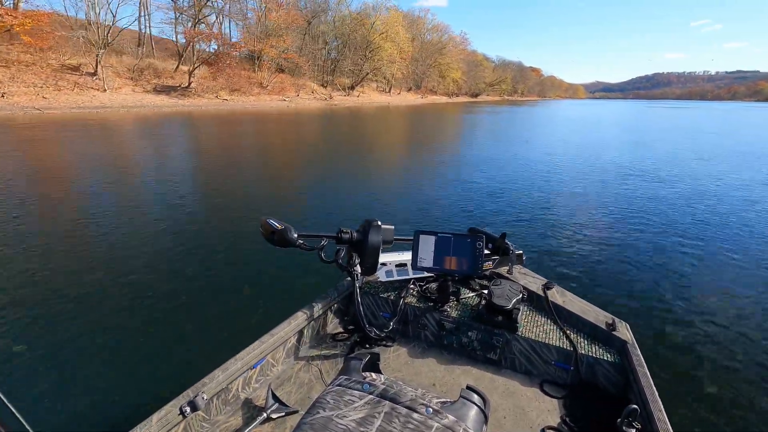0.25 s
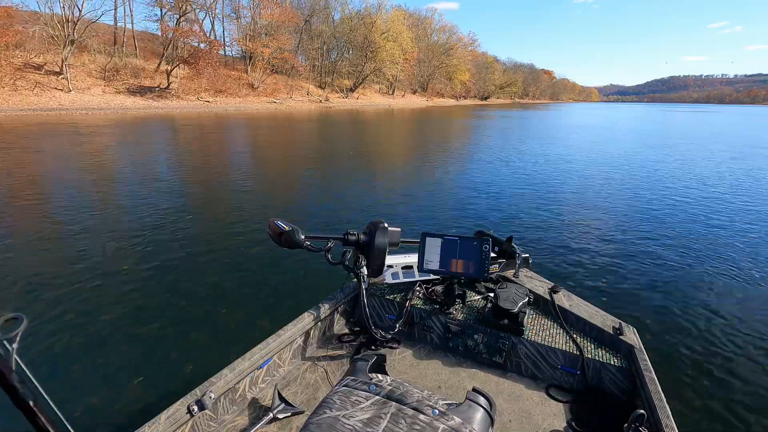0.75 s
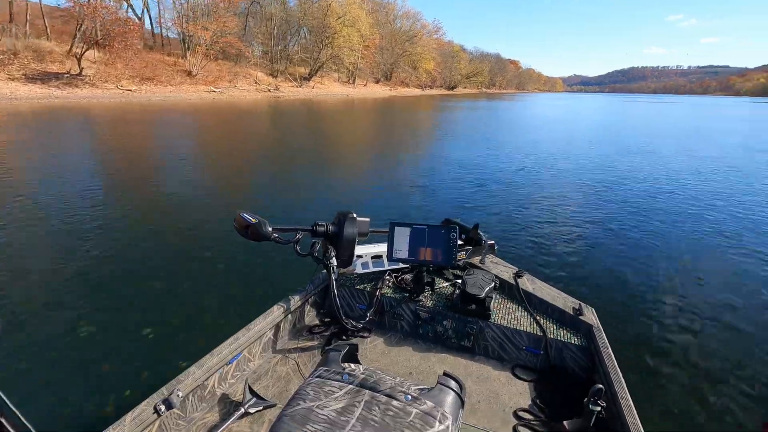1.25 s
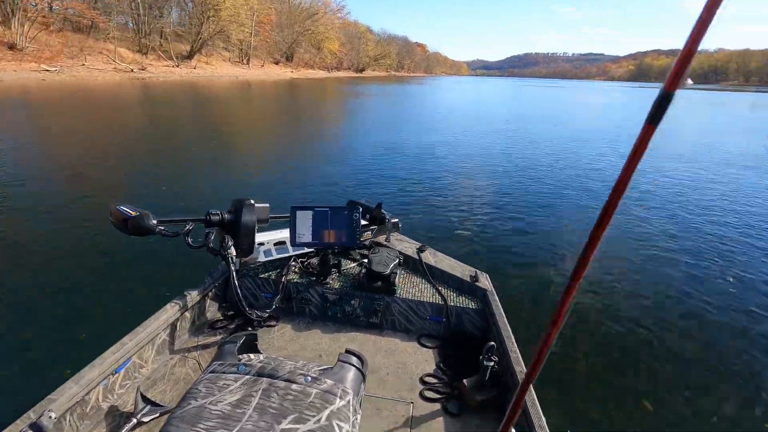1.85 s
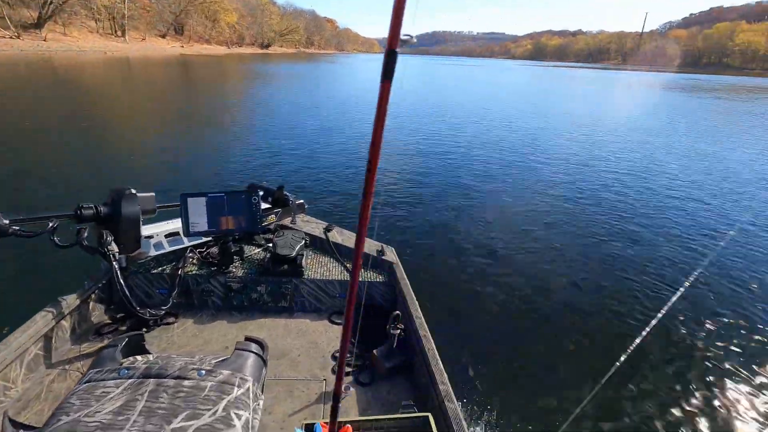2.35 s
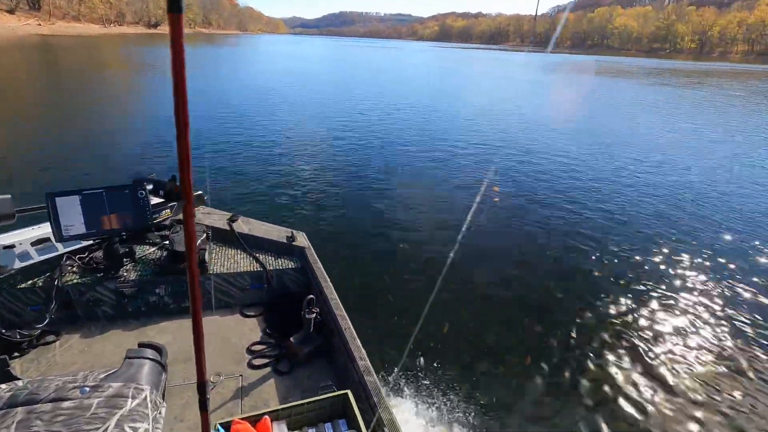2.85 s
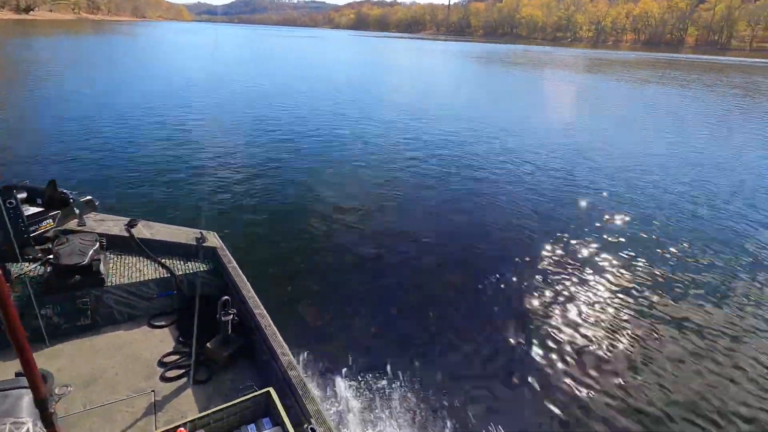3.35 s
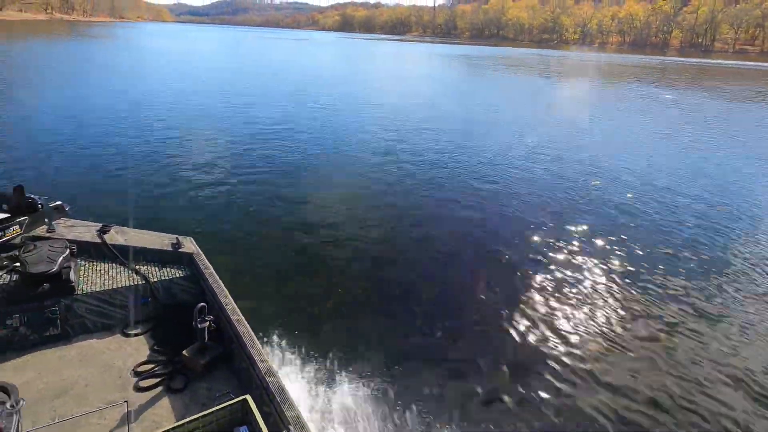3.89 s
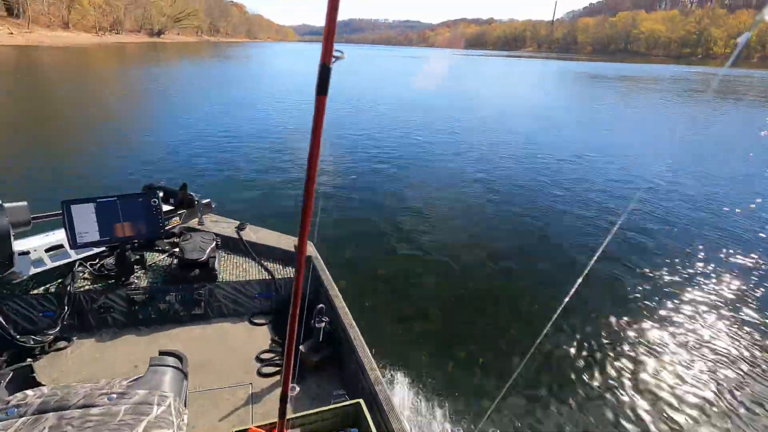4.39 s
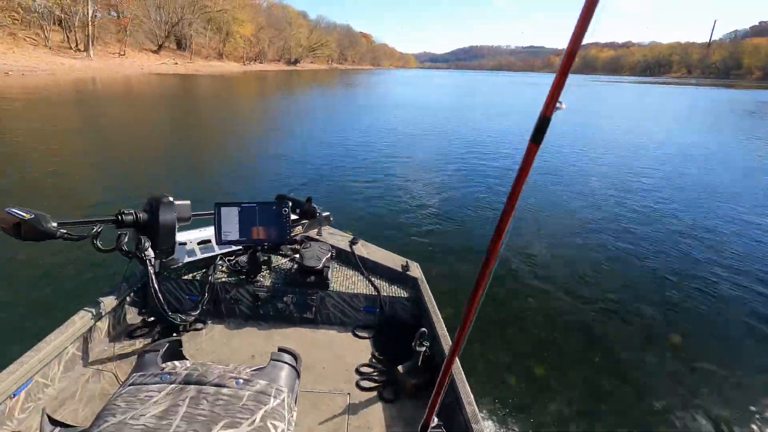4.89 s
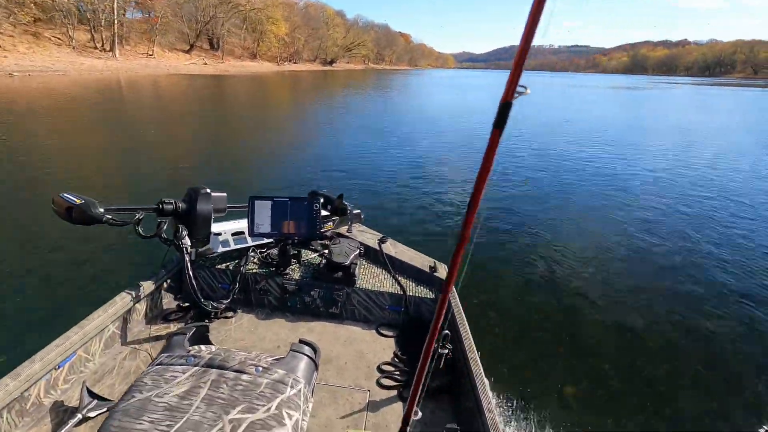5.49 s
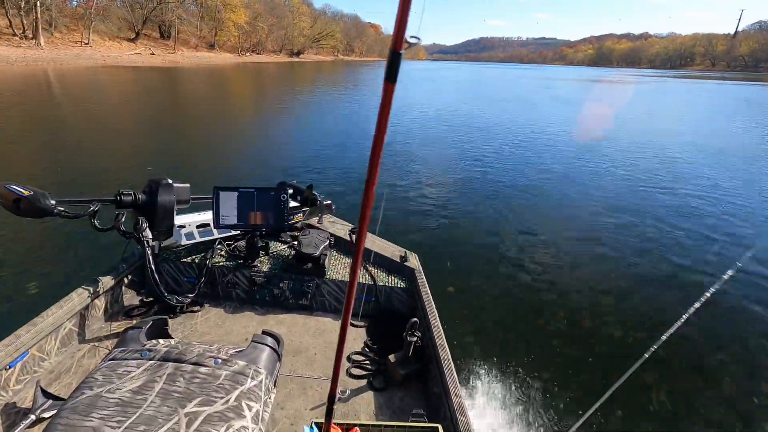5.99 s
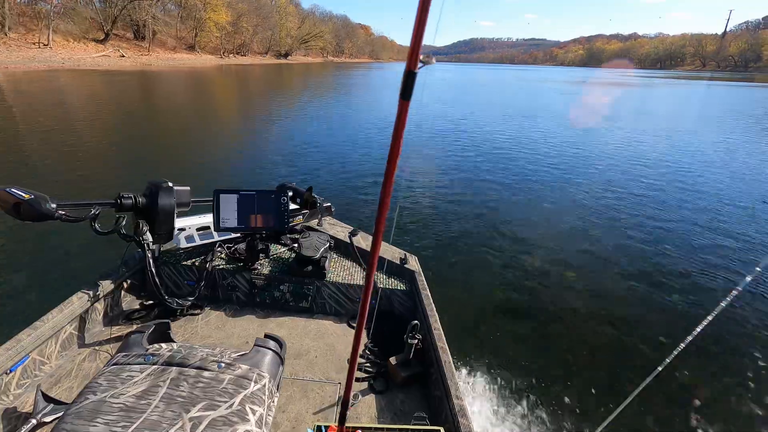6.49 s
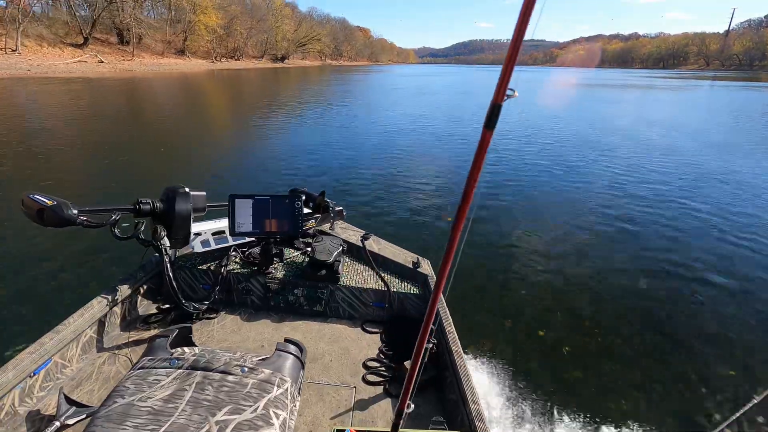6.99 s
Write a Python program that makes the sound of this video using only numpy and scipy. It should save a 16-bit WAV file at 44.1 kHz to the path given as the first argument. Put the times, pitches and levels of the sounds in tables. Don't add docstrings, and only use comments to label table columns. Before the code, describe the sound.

A boat engine holds one low, buzzing note around 160 hertz without changing speed. Wind hits the exposed onboard microphone in soft round thumps, low rumble and crackling gusts, moderate at first, then choppier from about two seconds and strongest and longest near five. Behind it lie a thin water hiss, a faint pump whine and an airy high whistle. Outdoors, dry and close.

```python
import sys
import numpy as np
from scipy import signal
from scipy.fft import rfft, irfft
from scipy.io import wavfile
from scipy.ndimage import uniform_filter1d, minimum_filter1d

SR = 44100
rng = np.random.default_rng(int(sys.argv[2]) if len(sys.argv) > 2 else 0)


def int16_out(signal):
    q = np.round(np.clip(np.atleast_2d(signal).T, -1, 1) * 32767)
    wavfile.write(sys.argv[1], SR, q.astype(np.int16))


def level_to_linear(level):
    exponent = np.asarray(level, float) / 20
    return 10 ** exponent


N = 319284
T = np.arange(N) / SR

# time in seconds, shaft turns in Hz.
SHAFT_SPEED = [(0.25, 39.9), (0.65, 40.22), (1.05, 40.28), (1.45, 40.11), (1.85, 39.98), (2.25, 40.05),
               (2.65, 40.06), (3.05, 40.02), (3.45, 40.05), (3.85, 39.98), (4.25, 40.01), (4.65, 40.05),
               (5.05, 40.11), (5.45, 40.05), (5.85, 40.23), (6.25, 40.19), (6.65, 40.05)]
# level in dB, waver in dB.
SHAFT_ORDERS = [(-38, 0.5), (-31, 0.5), (-35.5, -0.5), (3, -0.5), (-24, 6), (-23, 2.5), (-32.5, 2.5),
                (-22.5, 2), (-38, 3.5), (-25.5, 2.9), (-43.5, 1.5), (-38, 5), (-36, 2.5), (-27, 0),
                (-42, -1), (-35, 2), (-36, 4.5), (-47.5, 1.5), (-38.5, 5), (-47.5, 0.5), (-50, 1.5),
                (-50.5, 4), (-38.5, 1.5), (-47.5, 1), (-42.5, 4)]
# time in seconds, casing in dB, pump whine in dB.
FACING = [(0, 2, -54), (.7, 3.5, -49.5), (1.72, 2.5, -50.5), (1.9, 2.5, -65), (2.4, -4.5, -63),
          (3.25, -2, -60), (3.6, -2, -54), (4.1, 3.5, -48), (4.3, 2.5, -62), (5.6, -2, -63.5),
          (6.5, -4.5, -65), (7.24, 0, -62)]
# frequency in Hz, density in dB per Hz.
CLATTER_COLOUR = [(150, -29), (250, 2.5), (448, -19), (557, -19.5), (844, -19), (1710, -26), (2020, -29),
                  (3000, -38), (3900, -64), (6600, -120)]
# frequency in Hz, level in dB.
INTAKE_TONES = [(132.5, -37), (265, -36.5)]
# time in seconds, spray in dB, brightness at the top in dB.
SPRAY_VIEW = [(0, -57, -6.5), (.8, -56, -9.5), (1.65, -56, -8.5), (1.98, -58, -15.5), (2.14, -57.5, -9.5),
              (2.96, -57, -9), (3.39, -52, -8.5), (4.17, -49.5, -8), (4.38, -57.5, -10.5),
              (4.49, -53.5, -13), (4.94, -57, -13.5), (5.4, -55.5, -8.5), (5.85, -54, -11.5),
              (6.09, -51, -10.5), (6.25, -53, -11), (6.35, -52, -7.5), (6.69, -56.5, -8.5),
              (7.24, -52, -10)]
# frequency in Hz, density in dB per Hz.
SPRAY_COLOUR = [(880, -36), (1500, -7.5), (1630, -2.5), (1710, -6.5), (1770, -7.5), (2090, -10), (2550, -3),
                (3170, -3.5), (4140, -4), (5630, -9.5), (6930, -10), (9190, -16.5), (10900, -26.5),
                (14200, -53), (22000, -120)]
# frequency in Hz, density in dB per Hz.
HIGH_HISS_COLOUR = [(9000, -30), (11000, 0), (12500, -4), (14000, -8), (15800, -13), (17000, -40)]
# time in seconds, strength in dB, weight of large slow eddies in dB.
WIND_STREAM = [(0, -26.5, -2.5), (.5, -32.5, 2), (.8, -30.5, 1.5), (1.4, -27, 0), (1.7, -32.5, 3.5),
               (1.79, -22.5, 0.5), (2.03, -22.5, -1), (2.14, -31.5, 0), (2.55, -30.5, 1), (3.3, -32.5, -3),
               (4.12, -28, -4.5), (4.33, -23.5, 2), (4.45, -29.5, 2), (4.7, -20, -0.5), (5.52, -20.5, 1.5),
               (5.75, -31.5, -1.5), (6.75, -34, -0.5), (7.05, -20, -1.5)]
# frequency in Hz, density in dB per Hz.
RUMBLE_COLOUR = [(8.8, -37), (15, -13), (65, 3.5), (107, -2), (131, -13), (135, 4.0), (180, -37.5),
                 (300, -120), (200, -12.0), (400, -35)]
# frequency in Hz, density in dB per Hz.
BUFFET_COLOUR = [(60, -33.5), (130, 8.5), (210, 10), (300, 0.5), (500, -5), (900, -19.5), (2000, -42.5)]
# start in seconds, length in seconds, level in dB, growth from start to end in dB,
# sharpness at the top in dB.
GUSTS = [(-.05, 1.8, -35.5, 1.5, -7), (1.774, .13, -31, -3, -17), (1.973, 0.059, -34.5, 1, -14),
         (2.132, .33, -35, 2, -5.5), (2.488, 0.062, -30.5, -1.5, -12), (2.543, .11, -28.5, 0, -8.5),
         (2.651, 0.36, -29.5, -0.5, -14.5), (3.037, .16, -31.5, -3.5, -17), (3.589, .58, -35, 1.5, -12.5),
         (4.188, 0.058, -30.5, 3.5, -15.5), (4.257, 0.12, -24.5, 2, -11.5), (4.433, 0.18, -33, -0.5, -15.5),
         (4.987, 0.088, -33, -1, -16.5), (5.1, .14, -30, 3, -12.5), (5.263, .2, -30, 2, -15.5),
         (5.475, 0.13, -33.5, -1.5, -22), (5.918, 0.093, -28.5, 4, -12.5), (6.017, 0.041, -25.5, 1, -8),
         (6.084, .075, -29.5, 3, -11), (6.182, 0.072, -29.5, 6, -11), (6.267, .19, -31.5, 2, -16),
         (6.468, .45, -36, -2, -7.5), (7.017, 0.044, -39.5, -0.5, -18), (7.159, 0.15, -35, 3.5, -6.5)]
# frequency in Hz, density in dB per Hz.
TEAR_COLOUR = [(180, -29), (300, -4), (390, 0), (653, -4.5), (735, -6), (1750, -17.5), (3920, -29.5),
               (7000, -58.5), (9100, -78.5), (15400, -120)]
# time in seconds, peak in dB.
SNAPS = [
    (1.764, -29.5),
    (2.475, -18),
    (4.43, -25),
    (4.942, -36.5),
    (5.951, -23),
    (6.204, -24),
    (6.454, -28),
    (7.003, -23),
    (7.197, -24),
    (7.224, -22.5),
]
# time in seconds, level in dB, length in seconds.
THUMPS = [(.725, -14.5, 0.018), (.764, -17, 0.018), (.855, -17, 0.019), (.923, -13.5, 0.013),
          (.985, -12, 0.035), (1.439, -13.5, 0.016), (1.786, -11, 0.02), (2.027, -14, .02),
          (2.255, -16, 0.024), (2.313, -17, 0.013), (2.507, -13, 0.019), (2.611, -17, 0.014),
          (2.809, -9.5, 0.023), (3.118, -13.5, 0.02), (4.144, -11, 0.027), (4.699, -13.5, 0.027),
          (4.753, -21, 0.013), (4.849, -21.5, 0.051), (4.946, -19.5, 0.043), (5.005, -25, 0.024),
          (5.135, -19, 0.1), (5.267, -22, .035), (5.409, -19.5, 0.047), (5.561, -22, 0.067),
          (5.756, -21, 0.02), (6.189, -19, 0.034), (6.423, -17, 0.021), (6.484, -15.5, 0.018),
          (7.097, -10, 0.01), (7.166, -22, 0.087)]
# time in seconds, pitch in Hz, level in dB.
WHISTLE = [(0, 6800, -64), (.5, 6880, -62), (.8, 7310, -58), (1.5, 7470, -59.5), (1.72, 7900, -58),
           (1.8, 7900, -72), (2.4, 7700, -65), (3.2, 7120, -63.5), (4.2, 7860, -61.5), (4.6, 8200, -62.5),
           (5.6, 8000, -63), (6.3, 8190, -61), (7.24, 7900, -60.5)]
# frequency in Hz, level in dB.
ELECTRONICS = [(11530, -99), (11861, -96)]


def evened(x):
    return x / np.sqrt(np.mean(x ** 2) + 1e-20)


def column(rows, index):
    rows = np.array(rows)
    return np.interp(T, rows[:, 0], rows[:, index])


def wander(hz):
    z = rfft(rng.standard_normal(8192))
    slow = irfft(z * np.exp(-(np.arange(len(z)) * SR / N / hz) ** 2))
    return np.interp(T, np.linspace(0, N / SR, len(slow)), evened(slow))


def noise(colour, size, patchy_db, flicker_db, tilt_db=np.zeros(N), from_hz=1e3, to_hz=2e3):
    hop = size // 4
    hz = np.fft.rfftfreq(size, 1 / SR)
    frames = N // hop + 5
    a, b, patches = rng.standard_normal((frames, len(hz), 3)).T
    patches = uniform_filter1d(patches, size=size // 64, axis=0)
    patches = evened(uniform_filter1d(patches, size=8192 // size + 2, axis=1))
    flicker = evened(uniform_filter1d(rng.standard_normal(frames), size=3))
    f, db = np.transpose(colour)
    colour_db = np.interp(np.log(hz + 1), np.log(f + 1), db, -120, -120)[:, None]
    field_db = colour_db + patchy_db * patches + flicker_db * flicker
    share = np.clip(np.log(hz / from_hz + 1e-9) / np.log(to_hz / from_hz), 0, 1.5)
    tilt_db = (tilt_db - tilt_db.mean())[np.minimum(np.arange(frames) * hop, N - 1)]
    z = (a + 1j * b) * level_to_linear(field_db + share[:, None] * tilt_db)
    return evened(signal.istft(z, nperseg=size, noverlap=size - hop)[1][:N])


def engine():
    turns = 2 * np.pi * np.cumsum(column(SHAFT_SPEED, 1)) / SR
    boom_db = -14 + 0.42 * wander(5)
    boom = np.sqrt(2) * level_to_linear(boom_db) * shaft_orders(turns)
    return boom + clatter(turns) + pump_whine(turns) + intake_drone()


def shaft_orders(turns):
    facing_db = column(FACING, 1)
    out = np.zeros(N)
    for k, (db, waver_db) in enumerate(SHAFT_ORDERS, 1):
        level_db = db + 0.87 * waver_db * wander(5) + (k > 5) * facing_db
        phase = 0.17 * waver_db * wander(1.0) + 0.19 * k ** 2
        out += level_to_linear(level_db) * np.cos(k * turns + phase)
    return out


def clatter(turns):
    throb = 1 + 0.06 * np.cos(turns) + 0.1 * np.cos(2 * turns + 1.8) + 0.05 * np.cos(3 * turns + 0.4)
    rattle = noise(CLATTER_COLOUR, size=1024, patchy_db=2.0, flicker_db=-0.5)
    return level_to_linear(-32 + column(FACING, 1)) * throb * rattle


def pump_whine(turns):
    level_db = column(FACING, 2) + 1 + 0.9 * wander(9)
    return level_to_linear(level_db) * np.cos(42 * turns + 0.49 * wander(6))


def intake_drone():
    out = np.zeros(N)
    for hz, db in INTAKE_TONES:
        level_db = db - 0.66 * column(FACING, 1) + 4.1 * wander(4.8)
        out += level_to_linear(level_db) * np.cos(2 * np.pi * hz * T + 1.5 * wander(2.3))
    return out


def spray():
    hiss = noise(SPRAY_COLOUR, size=512, patchy_db=0.32, flicker_db=0.37,
                 tilt_db=column(SPRAY_VIEW, 2), from_hz=5000, to_hz=10000)
    return level_to_linear(column(SPRAY_VIEW, 1) + 7.5 + 0.7 * wander(12)) * hiss


def high_hiss():
    hiss = noise(HIGH_HISS_COLOUR, size=512, patchy_db=1.0, flicker_db=5.0)
    return level_to_linear(-30 + column(SPRAY_VIEW, 1)) * hiss


def rumble():
    follow_db = 0.6 * (column(WIND_STREAM, 1) + 27.5)
    level_db = -29 + follow_db + column(WIND_STREAM, 2) + 1.8 * wander(17)
    return level_to_linear(level_db) * noise(RUMBLE_COLOUR, size=2048, patchy_db=1.0, flicker_db=-0.5)


def buffeting():
    level_db = column(WIND_STREAM, 1) + 2.0 + 1.3 * wander(14) + 0.55 * wander(27)
    return level_to_linear(level_db) * noise(BUFFET_COLOUR, size=2048, patchy_db=-0.04, flicker_db=-1.0)


def gusts():
    onset_s, dying_s = 0.018, 0.019
    power, sharp = np.full(N, 1e-6), np.full(N, -1e-5)
    for start, length, db, growth_db, sharp_db in GUSTS:
        before = np.maximum(start - T, 0)
        after = np.maximum(T - start - length, 0)
        gate = np.exp(-(before / onset_s) ** 2 - after / dying_s)
        progress = np.clip((T - start) / length, 0, 1) - 0.5
        part = (gate * level_to_linear(db + growth_db * progress)) ** 2
        power += part
        sharp += sharp_db * part
    return 10 * np.log10(power), sharp / power


def tearing():
    gust_db, sharp_db = gusts()
    above = 1 / (1 + level_to_linear(-34 - gust_db) ** 3)
    tear = noise(TEAR_COLOUR, size=256, patchy_db=0.07, flicker_db=1.7,
                 tilt_db=sharp_db, from_hz=1000, to_hz=3000)
    snaps = np.zeros(N)
    for s, db in SNAPS:
        rise = np.clip((T - s) / 0.0014, 0, 1)
        decay = np.exp(-np.clip(T - s, 0, 1) / 0.0048)
        snaps += level_to_linear(db + 0.5) * decay * rise
    return (above * level_to_linear(gust_db + 3.5 + 1.0 * wander(25)) + snaps) * tear


def thumps():
    out = np.zeros(N + SR)
    t = np.arange(-0.2, 0.2, 1 / SR)
    for (s, db, length), (phase, off) in zip(THUMPS, rng.random((len(THUMPS), 2))):
        hz = 204.3 * (1 + 0.027 * (2 * off - 1))
        ring = np.exp(-2.8 * (t / length) ** 2) * np.cos(2 * np.pi * (hz * t + phase))
        at = round((s - 0.2) * SR)
        out[at:at + len(t)] += np.sqrt(2) * level_to_linear(db) * ring
    return out[:N]


def whistle():
    slow = signal.lfilter(*signal.butter(2, 420, fs=SR), rng.standard_normal((2, N)))
    pitch_hz = column(WHISTLE, 1) + 60 * wander(9.5)
    turn = np.exp(2j * np.pi * np.cumsum(pitch_hz) / SR)
    band = evened(((slow[0] + 1j * slow[1]) * turn).real)
    return level_to_linear(column(WHISTLE, 2) + 1.1 * wander(12)) * band


def electronics():
    return sum(level_to_linear(db + 4.0) * np.sin(2 * np.pi * hz * T) for hz, db in ELECTRONICS)


def duck(air, depth):
    push = uniform_filter1d(uniform_filter1d(air ** 2, size=400), size=400)
    return (1 + push / level_to_linear(-17) ** 2) ** -depth


def scene():
    low, tear, rings = rumble() + buffeting(), tearing(), thumps()
    heard = low + level_to_linear(2) * tear + rings
    boat = -engine() * duck(heard, 0.63)
    far = (spray() + whistle() + electronics()) * duck(low + tear, 0.15)
    return (boat + far + high_hiss() + low + tear + rings)[None]


def low_pass(x):
    return signal.sosfilt(signal.butter(12, 15720, fs=SR, output="sos"), x)


def record(dry):
    room = np.minimum((0.47 / (abs(dry) + 1e-9)) ** 0.6, 1)
    gain = uniform_filter1d(minimum_filter1d(room, size=330), size=300)
    return low_pass(dry * gain)


dry = scene()
out = record(dry)
int16_out(out)
```